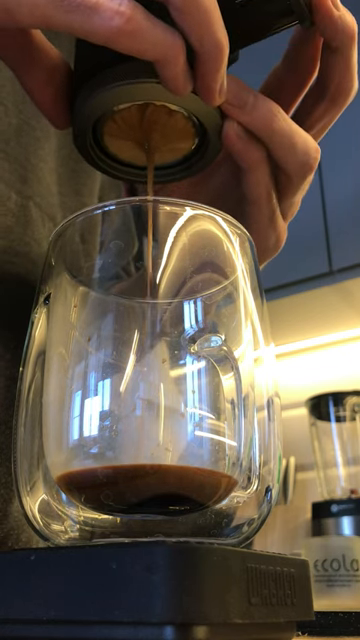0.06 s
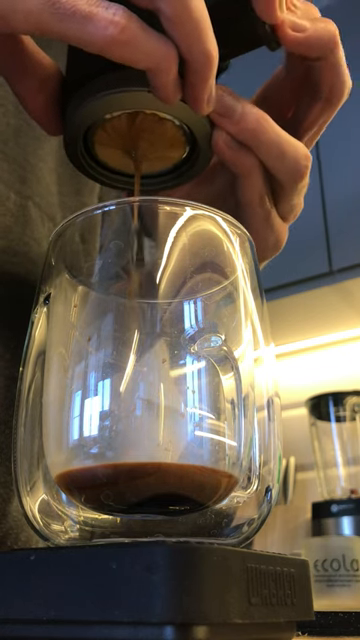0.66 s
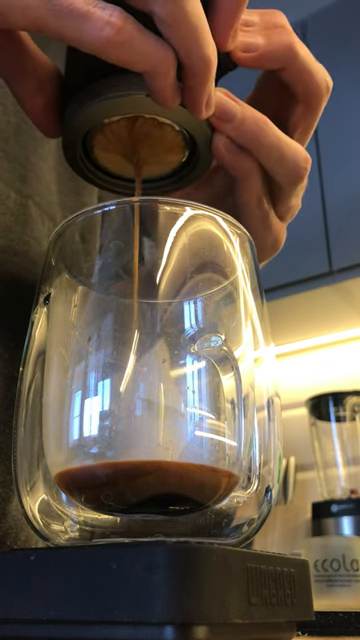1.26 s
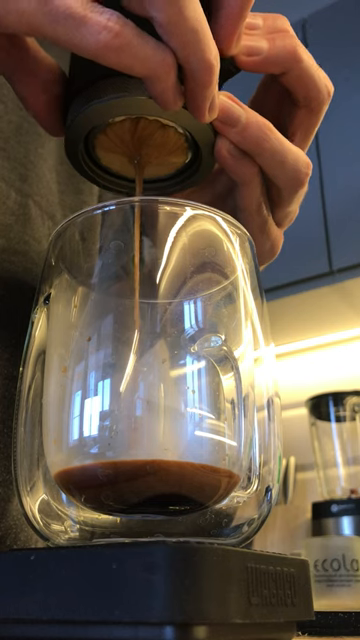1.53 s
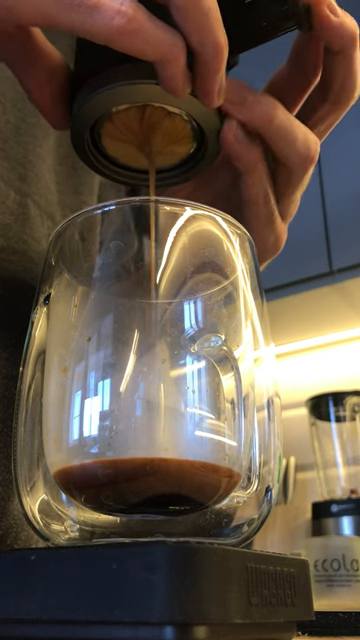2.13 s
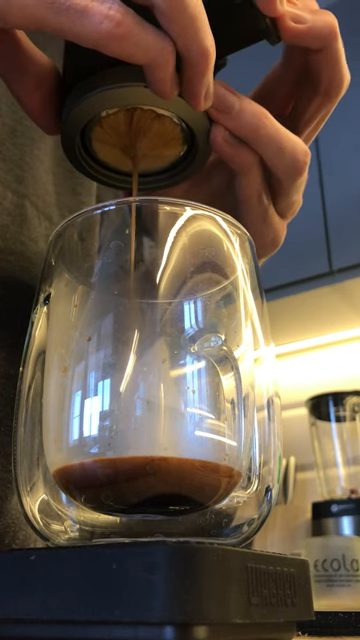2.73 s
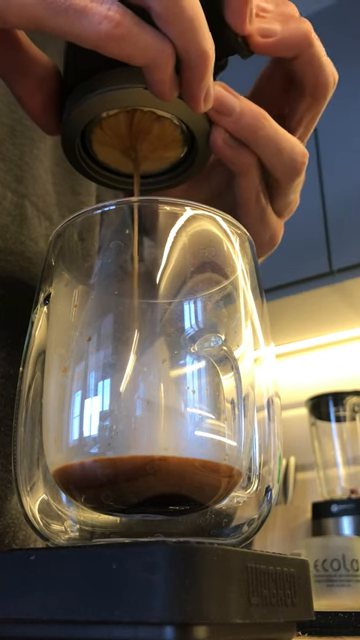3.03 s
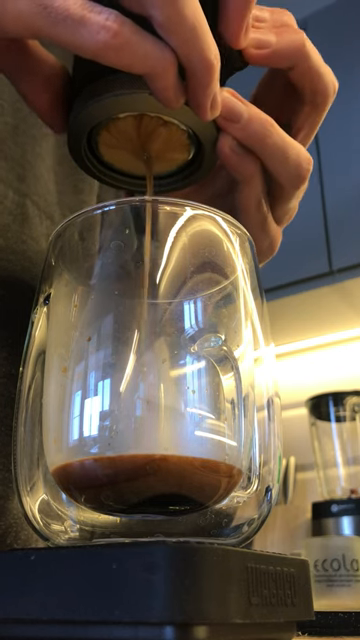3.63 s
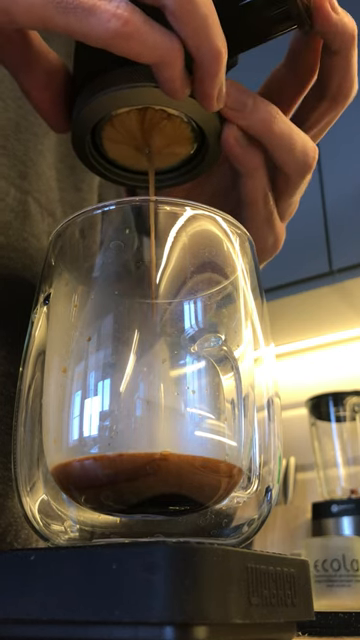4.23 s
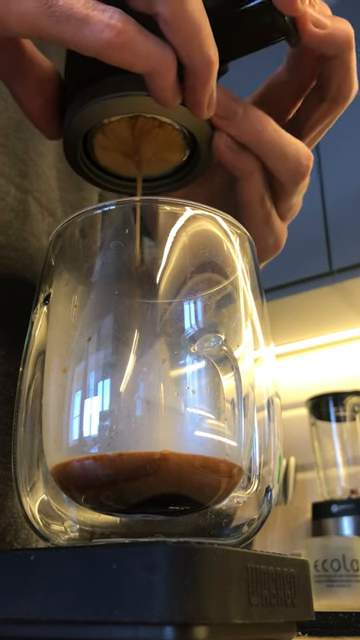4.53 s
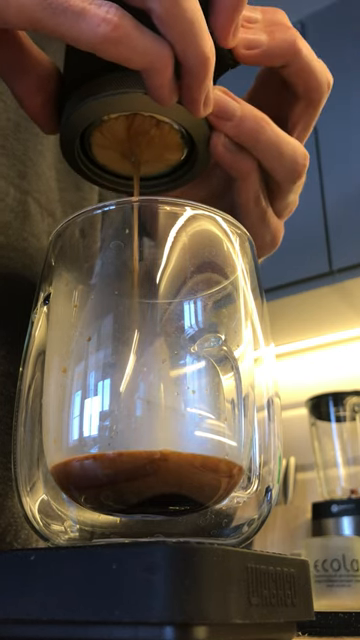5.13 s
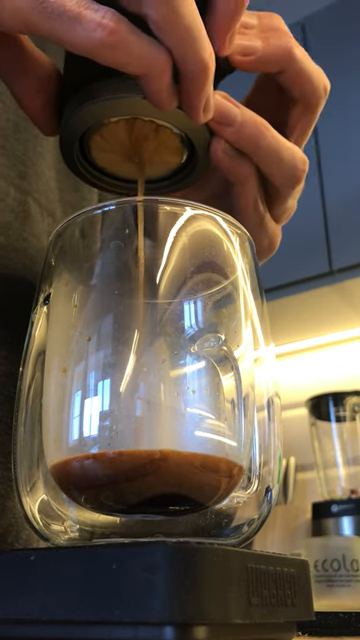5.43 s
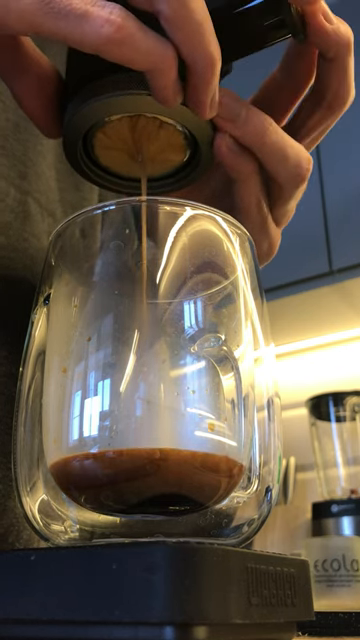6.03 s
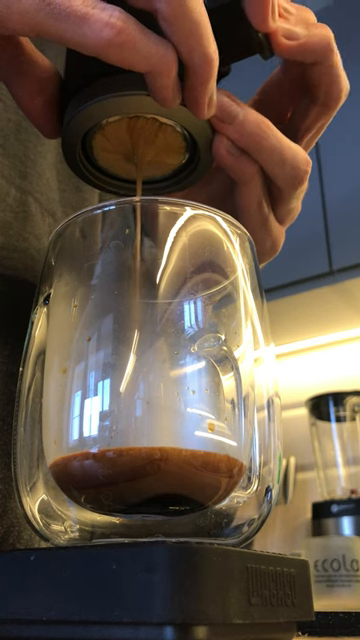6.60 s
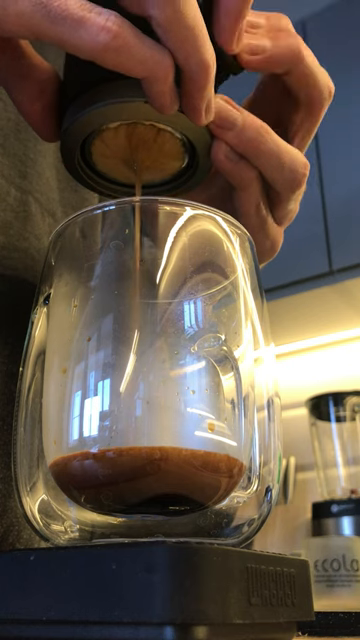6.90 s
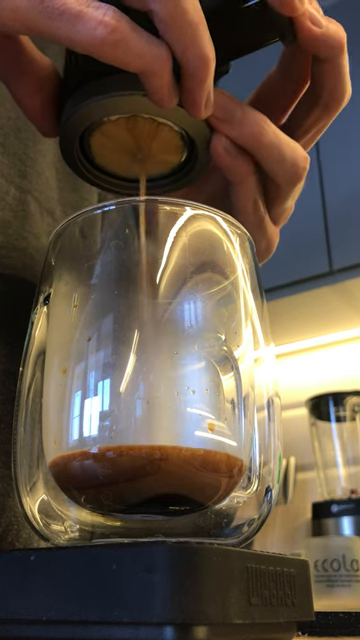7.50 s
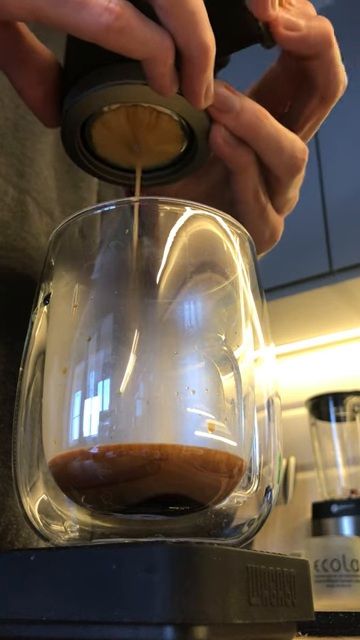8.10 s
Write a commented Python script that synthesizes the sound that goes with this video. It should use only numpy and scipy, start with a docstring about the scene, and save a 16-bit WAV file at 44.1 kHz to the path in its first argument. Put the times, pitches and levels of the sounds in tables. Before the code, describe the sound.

Coffee drips and plops into a glass, swelling with each push on a clicking hand pump in a quiet kitchen.

```python
"""A thin stream of espresso falls from a hand-pumped press into a double-walled glass cup.
It breaks into drops; each one ticks on the coffee and sets the air in the cup ringing with a plop,
lower as the cup fills. Drops, fine spatter and crackling foam swell with each push on the pump.
Sharp clicks come from the press and from crisply landing drops, and there is one faint squeak.
Behind it all is a quiet kitchen, with short echoes, a humming appliance and a faint rumble."""
import sys
import numpy as np
from scipy import signal
from scipy.fft import rfft, irfft
from scipy.io import wavfile

SR = 44100
rng = np.random.default_rng(int(sys.argv[2]) if len(sys.argv) > 2 else 0)


def inscribe(sig):
    """Save sig as 16-bit PCM at rate SR to the path in sys.argv[1].

    A 1-D sig is mono; a 2-D sig holds one channel per row.
    Samples are clipped to [-1, 1] before scaling.
    """
    pcm = np.round(np.clip(np.atleast_2d(sig).T, -1, 1) * 32767)
    wavfile.write(sys.argv[1], SR, pcm.astype(np.int16))


N = 368235
TIME = np.arange(N) / SR

# Drops placed one by one, from loud to faint. Each row: start in seconds, then the relative levels # in dB of
# the plop, the wet splat and the bright tick.
PLACED_DROPS = [(0.049, -36, -52, -68.0), (0.0626, -25, -59, -73), (0.0714, -40, -56, -52),
                (0.0786, -33.5, -55, -66.0), (0.1142, -33, -63, -67), (0.1415, -37.5, -68, -72),
                (0.1517, -31, -64, -72), (0.1814, -37.0, -41, -64), (0.2016, -56, -58, -74),
                (0.2291, -36, -53, -57), (0.263, -35.5, -55, -66), (0.2752, -35.5, -64, -70),
                (0.3317, -35, -62, -74), (0.3664, -33.5, -53, -54), (0.3888, -35.5, -71.0, -51),
                (0.4258, -36, -64.0, -73.0), (0.5007, -31.5, -49, -55), (0.5148, -26, -36, -39),
                (0.5851, -30.5, -56, -65), (0.6613, -37.5, -63, -73), (0.7582, -32.5, -49, -49),
                (0.8422, -30, -50, -52.5), (0.8618, -32, -65, -72.0), (0.8827, -29, -61, -60),
                (0.9118, -38.5, -68, -70.0), (0.9481, -36.5, -57, -69), (1.0385, -34, -57, -62),
                (1.0719, -34.5, -64.0, -56), (1.0946, -41.5, -70, -53.5), (1.1082, -31, -49, -50),
                (1.1271, -33.5, -67, -72.0), (1.159, -34.5, -56, -55), (1.2031, -32, -72, -72.0),
                (1.2409, -42, -60, -62), (1.2647, -29, -53, -49), (1.2785, -32, -49, -50),
                (1.3014, -30.5, -62, -52), (1.3181, -29, -73, -73.0), (1.3285, -36, -39.5, -40),
                (1.3474, -30.0, -53, -46), (1.3598, -28, -52.0, -65.0), (1.3746, -20, -38, -41.5),
                (1.3899, -30, -42, -44), (1.4083, -26, -52.0, -46), (1.4456, -39, -53, -56),
                (1.4582, -35, -70.0, -72.0), (1.4759, -43, -63, -73), (1.4874, -23.0, -48, -61),
                (1.5249, -44, -54, -65), (1.5461, -28, -57, -62), (1.6021, -33.0, -46, -49),
                (1.6335, -37, -42, -42.5), (1.6465, -22.5, -39.5, -44), (1.6781, -28.5, -45.5, -46),
                (1.696, -28.0, -59, -66.0), (1.7079, -24.5, -54, -72.0), (1.7309, -52, -45, -42.5),
                (1.7557, -25.5, -55, -49), (1.7778, -19.5, -62, -60), (1.7948, -28, -70, -61.0),
                (1.8243, -46, -56, -50), (1.8376, -32.5, -64, -69.0), (1.8853, -26.5, -55, -67),
                (1.9537, -35.5, -53, -67), (2.0107, -37.5, -52, -51), (2.0442, -38.5, -51, -56),
                (2.1033, -29.5, -48, -46.5), (2.1217, -27.5, -46, -54), (2.1551, -37, -68, -72),
                (2.1635, -30, -67, -57), (2.177, -24.5, -41.5, -51), (2.2209, -39, -62, -66),
                (2.2386, -35, -50, -62), (2.376, -25.5, -43, -41), (2.4358, -42, -62, -53),
                (2.4525, -26.5, -60, -68), (2.4923, -33.5, -70, -75), (2.5083, -37, -60, -72),
                (2.6222, -33.5, -55, -74.0), (2.763, -43, -68, -63), (2.7761, -36, -69.0, -73.0),
                (2.8037, -43, -54, -57), (2.8514, -36.5, -54, -64), (2.8947, -32.5, -46.5, -48.5),
                (2.9117, -37, -61, -60), (2.949, -61, -51, -48), (2.9642, -33.5, -64, -66),
                (3.0735, -37, -69, -49), (3.1226, -30, -50, -47), (3.1278, -33, -52, -62),
                (3.1555, -33.5, -55.0, -53), (3.1866, -40, -66, -59), (3.1989, -27, -47, -49),
                (3.2125, -28.5, -47, -52), (3.222, -40, -56, -63), (3.2506, -37, -53, -51.5),
                (3.2816, -30.5, -53, -58), (3.2929, -37, -72, -69.0), (3.31, -32, -66, -53),
                (3.3396, -42.5, -69, -73), (3.3549, -40, -65, -70), (3.3676, -34.5, -55, -68.0),
                (3.3811, -39, -51, -46), (3.3958, -37, -49.5, -52), (3.4119, -35, -65.0, -63),
                (3.4239, -37, -74.0, -69.0), (3.4514, -27, -55, -60), (3.4679, -30, -44, -47),
                (3.4844, -34.5, -68.0, -58), (3.4958, -33, -43.5, -48), (3.5056, -53, -50, -61.0),
                (3.5167, -36, -56, -58), (3.5251, -65, -48, -44), (3.5422, -32.5, -49, -61),
                (3.5581, -35, -50, -55), (3.5777, -44, -53, -48), (3.5879, -40, -49, -56),
                (3.6002, -35, -56, -65), (3.6133, -34, -66.0, -64), (3.6283, -35, -64, -74),
                (3.6485, -30.5, -49, -49), (3.659, -37, -60, -59), (3.6681, -33, -62, -64.0),
                (3.6776, -36, -47, -50), (3.6837, -34, -50, -56), (3.6943, -40, -58, -50),
                (3.7105, -44, -70.0, -55), (3.7288, -39, -57, -57.0), (3.736, -48, -50, -43),
                (3.7569, -33.5, -49, -48), (3.764, -32.5, -43, -48), (3.7817, -30, -35.5, -36.5),
                (3.7994, -28, -40, -43), (3.8535, -36, -45, -61), (3.8781, -35.0, -57.0, -66),
                (3.8879, -36, -56, -65), (3.9141, -29.5, -45.0, -51), (3.9549, -36.0, -57.0, -58),
                (3.9639, -53, -53, -46.5), (3.9871, -35, -54, -41), (4.0145, -35.5, -43, -51),
                (4.0339, -25.5, -43.5, -51), (4.0474, -28, -55, -50), (4.0602, -48, -52, -47.5),
                (4.0846, -37, -71.0, -59), (4.0948, -39, -58, -47.5), (4.1084, -30, -46, -66.0),
                (4.1247, -42, -47, -48), (4.1395, -37, -61, -54), (4.1559, -39, -51, -51),
                (4.219, -31, -46, -49), (4.227, -45, -43.5, -45.5), (4.2924, -39.0, -51, -50),
                (4.3072, -36, -63, -61), (4.4851, -34.5, -49, -47.5), (4.5116, -35.5, -58, -74.0),
                (4.5273, -41, -60, -48), (4.5533, -36.5, -67, -69.0), (4.5922, -31, -56, -56),
                (4.6174, -36, -57, -48.0), (4.638, -29.5, -45, -48), (4.6857, -29.5, -49, -53),
                (4.7764, -33, -48, -52), (4.8778, -46, -49.5, -54), (4.8922, -38.5, -56, -56),
                (4.9262, -36.5, -57, -73.0), (4.9463, -38.5, -49, -47.5), (4.9732, -45, -51, -49.5),
                (4.991, -33.5, -45.0, -44.5), (5.0147, -42, -59.0, -48), (5.0303, -41.0, -57, -48.0),
                (5.0531, -38.5, -59, -61), (5.0814, -38.5, -57, -52), (5.1186, -70, -66, -47.5),
                (5.1485, -30.5, -47, -49), (5.1667, -35.5, -55, -72.0), (5.1976, -43, -63, -54),
                (5.2153, -32.5, -69, -64), (5.2383, -40, -67, -51), (5.3065, -47, -50.0, -54),
                (5.3384, -37.5, -49, -47.5), (5.3627, -34.5, -45, -49.5), (5.4115, -23.5, -43, -50),
                (5.4253, -30.5, -51, -51.5), (5.4668, -39, -53, -67), (5.492, -35.5, -48.5, -46.5),
                (5.5141, -35, -55, -64.0), (5.5309, -35.0, -66.0, -72.0), (5.5455, -34, -45, -49),
                (5.5632, -28.5, -43, -48), (5.5751, -38, -59, -54), (5.601, -40, -45, -44),
                (5.6115, -38.5, -54, -57), (5.6201, -35.5, -40, -44.5), (5.6393, -31, -51, -49),
                (5.6639, -35.5, -53, -51), (5.679, -41, -54, -43.5), (5.6985, -38, -43.5, -47),
                (5.7192, -38, -43, -47), (5.7399, -61, -54, -61), (5.7586, -31, -50, -60),
                (5.7962, -29.5, -61, -52), (5.811, -39, -53, -46), (5.8318, -38, -69, -72.0),
                (5.8404, -33.5, -48, -54), (5.8656, -34.5, -39.5, -42.5), (5.8863, -32, -48, -46),
                (5.9289, -34.5, -52, -57), (5.9496, -42, -51, -73), (5.9562, -38, -56, -66),
                (5.9802, -38.5, -71, -67), (5.9887, -39, -70, -70), (6.0545, -55, -52, -53),
                (6.1373, -33.5, -51, -46.5), (6.1709, -34, -59, -57), (6.1824, -44, -49, -51),
                (6.2316, -32, -52, -71.0), (6.2442, -40, -56, -70), (6.3072, -38.5, -59, -78),
                (6.3245, -29, -48, -54), (6.3438, -49, -57, -47.5), (6.4141, -39, -47, -45.5),
                (6.6876, -40.5, -52, -62), (6.706, -37, -44.5, -48.0), (6.7271, -53, -47, -40.5),
                (6.747, -38.5, -67.0, -64), (6.8154, -40.5, -45, -49), (6.852, -41.5, -53, -54),
                (6.862, -35, -48, -51.5), (6.9147, -42.5, -49.5, -54.0), (6.9366, -45.5, -68.0, -51),
                (6.9707, -37, -60, -55), (6.988, -35.0, -43.5, -47.0), (7.0059, -42, -63, -70.0),
                (7.0552, -43, -61, -72), (7.0907, -36, -47, -54), (7.1546, -29.5, -45, -53),
                (7.1705, -32, -47, -50), (7.1815, -31.5, -49, -53), (7.1955, -32.5, -52, -39),
                (7.2107, -44, -52, -51), (7.2245, -44, -49, -54), (7.2485, -38.5, -57.0, -67.0),
                (7.2612, -51, -60, -53), (7.284, -55, -50.0, -58), (7.3017, -40.5, -41, -42.5),
                (7.3221, -41, -59.0, -68.0), (7.4217, -62, -47, -59), (7.4449, -41, -43, -46),
                (7.4649, -38.5, -61, -50), (7.499, -52, -53, -47), (7.543, -41, -57, -59),
                (7.5641, -33.5, -45, -46), (7.5874, -38.5, -50.0, -55), (7.6045, -43, -55, -69),
                (7.631, -49, -58, -52), (7.6535, -36, -45, -53), (7.7244, -36, -54.0, -59),
                (7.7711, -36.5, -67.0, -71.0), (7.7851, -58, -54, -49.5), (7.7957, -36.5, -60, -70),
                (7.815, -46, -59, -57), (7.837, -38.5, -44, -47.5), (7.8534, -41, -48, -45.5),
                (8.0097, -39, -65.0, -60), (8.1094, -42.5, -47.5, -55), (8.3151, -43, -64, -50),
                (8.3329, -39.5, -64, -68)]
# Pushes on the pump. Each row: start in seconds, hold in seconds, lift of the flow in dB,
# lift of the spatter in dB. Each layer follows these lifts by its own share.
PUMP_PUSHES = [(0.0, 0.022, 9.5, 4), (1.31, 0.038, 4, 4.5), (1.66, 0.13, 9, 6.5), (3.48, 0.36, 8.5, 8),
               (5.52, 0.13, 12, 9), (7.25, 0.28, 10, 7)]
# Ringing tones of the air in and around the cup. Each row: first and last pitch in Hz, width in Hz
# (wider dies sooner), first and last relative level in dB, direction of the first swing (1 or -1).
CUP_AIR_TONES = [(658.4, 523, 54.6, 0, 3.5, 1), (701, 677, 43, -10, -12, -1),
                 (790.3, 771.7, 40.4, -0.5, 3.5, -1), (804, 792, 19, -19, -16, -1),
                 (881, 810, 39, -10, -7.5, 1), (1070, 1004, 63, -30, -6, -1),
                 (1197, 1146, 45, -25, -19.5, -1), (1255, 1290, 77, -24.5, -9, 1),
                 (1356, 1360, 49, -30, -18, -1)]
# Higher resonances of the cup. Each row: pitch in Hz, width in Hz, lift in dB.
CUP_HIGH_TONES = [(1660, 51, 6.5), (2035, 105, 13.5), (2380, 120, 3), (2650, 124, 10), (2980, 59, 9),
                  (3940, 224, 13.5), (4640, 165, 8.5), (5925, 84, 12.5), (6310, 230, 7.5),
                  (7340, 170, 10.5), (8490, 56, 17.5), (9040, 270, 4.5)]
# Sharp, bright clicks from the press and from crisply landing drops.
# Each row: start in seconds, relative levels in dB of the crack and the knock.
SHARP_CLICKS = [(0.1826, -49, -41.5), (0.3658, -59, -52), (0.515, -53, -40.5), (0.7606, -56, -70),
                (1.252, -49, -50), (1.3276, -52, -51), (1.3747, -53, -49), (1.6397, -48.5, -40.5),
                (1.657, -65, -61), (2.162, -51.5, -44.5), (2.3751, -47.5, -40), (2.587, -56, -50),
                (3.47, -56, -60), (3.6486, -52, -64), (3.7569, -56, -54), (3.78, -61, -44),
                (3.7994, -59, -42), (3.987, -53, -45), (4.0833, -58, -47), (4.305, -53.5, -51),
                (4.527, -61, -64), (5.1486, -52.5, -55), (5.3379, -55, -48), (5.587, -47, -55),
                (5.795, -53, -44), (5.886, -55.5, -54), (6.138, -50.5, -40), (6.9, -58, -56),
                (7.195, -55, -43.5), (7.3265, -52, -51), (7.3545, -49, -60), (7.366, -56, -55),
                (7.6525, -53.5, -59), (8.331, -56, -63)]
# The plastic housing snaps under the grip. Each row: start in seconds, relative level in dB.
HOUSING_SNAPS = [(7.327, -46)]
# Ringing tones of the housing. Each row: pitch in Hz, relative level in dB, seconds to fade by 60 dB.
HOUSING_TONES = [(1692, -5.5, 0.051), (2370, 3, 0.019), (2580, -8, 0.071), (2883, -11, 0.1),
                 (2990, 5, 0.0098), (3650, -1, 0.013), (4000, -10, 0.034), (4100, -13, 0.025)]
# A squeak, probably the pump's seal. Each row: start and length in seconds, pitch in Hz, level in dB.
SEAL_SQUEAKS = [(8.035, .035, 1970, -67)]
# Echoes off nearby surfaces. Each row: delay in seconds, level in dB.
KITCHEN_ECHOES = [(.0112, -32), (.0215, -25), (.0465, -25.5)]
# Motor hum; two close tones beat against each other. Each row: pitch in Hz, relative level in dB.
MOTOR_TONES = [(48.83, -70), (73.3, -79), (97.7, -81), (111.5, -75), (146.5, -66), (148.62, -68),
               (195.3, -61), (223, -74), (293, -79), (341.8, -72)]
# A low rumble that comes and goes. Each row: time in seconds, level in dB.
RUMBLE_LEVELS = [(0, -69), (.45, -62), (.8, -83), (7.4, -99), (7.8, -58), (8.35, -64)]

# Colours: how strong a sound is from bass to treble. Each row: frequency in Hz, relative level in dB.
SPLASH_COLOUR = [(900, -13), (1250, 12.5), (1600, -1.5), (2600, 0.5), (3300, -4.5), (4300, -3), (5300, -11),
                 (7000, -8.5), (7900, -13), (9500, -8), (12500, -7), (16000, 1.5)]   # a bare splash
CREMA_COLOUR = [(800, -29), (2000, 9), (4000, -10), (7000, -2), (9500, -37), (12500, 15), (15800, 3)]   # coffee foam crackling at the spout
CRACK_COLOUR = [(800, -10), (2000, -12), (4500, 2), (7000, 0), (9000, -2.5), (11500, 3.5), (15500, 3)]   # the crisp start of a click
BODY_COLOUR = [(400, -17), (900, 11.5), (1300, 14), (1650, -13), (2100, 10.5), (2700, -7), (3400, -32),
               (8000, -49)]   # the dull knock under a click
RATTLE_COLOUR = [(600, -58), (1100, -8), (1350, 6), (1520, -8), (1700, 0), (2200, -6), (2900, -2),
                 (3400, -14), (4400, -18), (6000, -40), (12000, -23)]   # the hollow rattle after a click
AIR_COLOUR = [(20, -41), (33, -15), (46, -12), (70, 2), (110, -4), (175, -0.5), (260, -2.5), (420, -5.5),
              (1000, -11.5), (1600, -21.5), (3200, -24.5), (8500, -31), (13000, -26), (15800, -24)]   # still kitchen air and hiss
LOW_RUMBLE_COLOUR = [(30, -17), (55, 10.5), (90, 6), (165, 14.5), (260, -7.5), (500, -32.5)]   # the passing rumble


def stream():
    """Drops placed one by one, a random trickle of drops and a drizzle of droplets, over the fizz of the foam
    in the cup."""
    drops = trickle(count=240, plop_db=-47, splat_db=-62, splash_spread_db=3, follows=0.27)
    droplets = trickle(count=1100, plop_db=-55.5, splat_db=-75, splash_spread_db=9.5, follows=1.15)
    ringing, splashing = placed_drops() + drops + droplets
    foam = fizz(-83 + 1.18 * spatter_db(TIME), per_s=1500, spread_db=5)
    return ringing + in_cup(splashing + spatter() + foam)


def placed_drops():
    """Each placed drop lands with a plop and a splash, returned as two tracks."""
    starts, plop_db, splat_db, tick_db = np.transpose(PLACED_DROPS)
    return np.array([plops(starts, plop_db), splashes(starts, splat_db, tick_db)])


def trickle(count, plop_db, splat_db, splash_spread_db, follows, plop_spread_db=4.5):
    """The stream pinches off drops of random size at a loosely even pace: plops and splashes."""
    late, size, splashiness = np.clip(rng.standard_normal((count, 3)), -3, 1.2).T
    starts = np.abs(np.arange(count) + .5 + .5 * late) * TIME[-1] / count
    # a placed drop gathers the liquid, so the trickle just before it is thinner
    wait_s = np.transpose(PLACED_DROPS)[0][:, None] - starts
    thinning_db = 5.5 * np.any((wait_s > 0) & (wait_s < 0.0098), axis=0)
    ring_db = plop_db + follows * flow_db(starts) - thinning_db + plop_spread_db * size
    splash_db = splat_db + follows * spatter_db(starts) - thinning_db
    splash_db += splash_spread_db * (size + splashiness) / np.sqrt(2)
    return np.array([plops(starts, ring_db), splashes(starts, splash_db, splash_db - 2)])


def plops(starts, levels_db, pitch_spread=.021, spread_db=2.2, hard_drop_db=-27):
    """Each drop rings the air in the cup a little differently; most tones sink as the coffee rises."""
    out, t = np.zeros(N), TIME[:3072]
    first_hz, last_hz, width_hz, first_db, last_db, direction = np.transpose(CUP_AIR_TONES)
    decay = np.sign(direction)[:, None] * np.exp(-np.pi * width_hz[:, None] * t)
    chances = rng.standard_normal((len(starts), 2, len(CUP_AIR_TONES)))
    for s, level_db, (pitch_chance, level_chance) in zip(starts, levels_db, chances):
        fill = s / TIME[-1]
        hz = (first_hz + fill * (last_hz - first_hz)) * (1 + pitch_spread * pitch_chance)
        # a harder landing rings the upper tones more
        tilt_db = 0.23 * (level_db - hard_drop_db) * np.log2(hz / hz[0])
        gains = from_db(first_db + fill * (last_db - first_db) + tilt_db + spread_db * level_chance)
        ring = gains @ (decay * np.sin(2 * np.pi * hz[:, None] * t))
        add(out, s, from_db(level_db) * ring / np.abs(ring).max())
    # the plops carry little bass below about 440 Hz
    return keep_band(out + 1e-18, "high", 440, order=4)


def splashes(starts, splat_db, tick_db):
    """A splash is a wet splat, a dry, brighter tick and a puff of fine spray."""
    splat = impacts(starts, splat_db + 3, band_hz=(1210, 2840), fade_s=0.0033)
    tick = impacts(starts, tick_db + 8, band_hz=(3580, 7570), fade_s=0.0018)
    puff = impacts(starts, tick_db + 6, band_hz=(9800, 14500), fade_s=0.0095)
    return splat + tick + puff


def impacts(starts, levels_db, band_hz, fade_s, spray_share=.6, size=512):
    """Liquid lands with a sharp hit and a tiny burst of spray, heard in one frequency band."""
    spray = rng.standard_normal((len(starts), size)) * np.exp(-TIME[:size] / fade_s)
    spray *= spray_share / np.linalg.norm(spray, axis=1, keepdims=True)
    bursts = keep_band(signal.unit_impulse(size) + spray, "band", band_hz, order=2)
    out = np.zeros(N)
    for s, level_db, burst in zip(starts, levels_db, bursts):
        add(out, s, from_db(level_db) * burst / np.linalg.norm(burst))
    return out


def spatter(count=380, follows=1.06, spread_db=4.5):
    """Specks thrown off the stream tick on the coffee and the glass, too small to plop."""
    starts = rng.uniform(0, TIME[-1], count)
    sizes = np.clip(rng.standard_normal(count), -2, 1.5)
    levels_db = -61 + follows * (spatter_db(starts) - 3) + spread_db * sizes
    return splashes(starts, levels_db, levels_db - 1)


def in_cup(sound):
    """Every splash is coloured by the same higher resonances of the glass cup."""
    out = coloured(sound, SPLASH_COLOUR)
    for hz, width_hz, lift_db in CUP_HIGH_TONES:
        out = out + (from_db(lift_db) - 1) * resonance(out, hz, width_hz)
    return out


def flow_db(times):
    """Drops land harder with each push, and softer as the growing foam cushions them."""
    lifts_db = np.transpose(PUMP_PUSHES)[2]
    return pump_swell(times, lifts_db, rise_s=0.037, fall_s=0.17) - 0.5 * times


def spatter_db(times):
    """Under pressure the stream spatters and foams more."""
    lifts_db = np.transpose(PUMP_PUSHES)[3]
    return pump_swell(times, lifts_db, rise_s=0.042, fall_s=0.24)


def pump_swell(times, lifts_db, rise_s, fall_s):
    """The lift in dB at these times: each push builds up, holds and relaxes."""
    start, hold = np.transpose(PUMP_PUSHES)[:2, :, None]
    before = np.maximum(start - times, 0) / rise_s
    after = np.maximum(times - start - hold, 0) / fall_s
    return np.max(lifts_db[:, None] * np.exp(-before - after), axis=0)


def fizz(level_db, per_s, spread_db):
    """Foam bubbles burst at random: many tiny ones, a few larger."""
    sizes = from_db(spread_db * np.minimum(rng.exponential(1, N), 3))
    signs = rng.choice([-1, 1], N)
    bursting = rng.random(N) < per_s / SR
    return from_db(level_db) * unit_power(sizes * signs * bursting)


def spout():
    """Above the cup the foam crackles brightly as the coffee is pushed out."""
    crackle = fizz(-85.5 + 0.46 * spatter_db(TIME), per_s=490, spread_db=7.5)
    return coloured(crackle, CREMA_COLOUR)


def sharp_clicks(crack_s=0.0044, grit_s=0.019, knock_s=0.0019, rattle_s=0.03):
    """The press or a crisply landing drop clicks: a gritty crack, a dull knock and a hollow rattle."""
    cracks, knocks, rattles = np.zeros((3, N))
    t = TIME[:8192]
    crack_fade = np.exp(-t / crack_s) + from_db(-6) * np.exp(-t / grit_s)
    for s, crack_db, knock_db in SHARP_CLICKS:
        noise = rng.standard_normal((3, len(t)))
        add(cracks, s, from_db(crack_db - 6) * noise[0] * crack_fade)
        add(knocks, s, from_db(knock_db) * noise[1] * np.exp(-t / knock_s))
        add(rattles, s, from_db(knock_db - 19) * noise[2] * np.exp(-t / rattle_s))
    return (coloured(cracks, CRACK_COLOUR) + coloured(knocks, BODY_COLOUR)
            + coloured(rattles, RATTLE_COLOUR))


def housing():
    """The plastic housing rings when it snaps under the grip; each click gets a faint, similar ring."""
    out, t = np.zeros(N), TIME[:8192]
    ring = sum(from_db(db - 60 * t / fade_s) * np.sin(2 * np.pi * hz * t)
               for hz, db, fade_s in HOUSING_TONES)
    for s, level_db in HOUSING_SNAPS:
        add(out, s, from_db(level_db) * ring)
    for s, _, knock_db in SHARP_CLICKS:
        add(out, s, from_db(knock_db - 19) * ring)
    return out


def squeak(glide=-0.1, roughness=0.03):
    """A faint, short squeak that sinks in pitch."""
    out = np.zeros(N)
    for s, length_s, hz, level_db in SEAL_SQUEAKS:
        progress = np.linspace(0, 1, int(length_s * SR))
        pitch_hz = hz * (1 + glide * progress + roughness * rng.standard_normal(len(progress)))
        tone = np.sin(2 * np.pi * np.cumsum(pitch_hz) / SR)
        add(out, s, from_db(level_db) * np.sin(np.pi * progress) * tone)
    return out


def kitchen(sound, split_hz=1300, tail_delay_s=.003):
    """A few echoes off counter and cupboards, and a smooth tail whose treble dies sooner."""
    low = keep_band(dying_noise(fade_s=0.16), "low", split_hz, order=2)
    high = keep_band(dying_noise(fade_s=0.1), "low", 6000, order=1)
    high = keep_band(high, "high", split_hz, order=3)
    tail = from_db(-12.5) * low + from_db(-6.5) * high
    echoes = np.pad(tail, (int(tail_delay_s * SR), 0))
    for s, db in KITCHEN_ECHOES:
        echoes[int(s * SR)] += from_db(db)
    return sound + signal.fftconvolve(sound, echoes)[:N]


def motor_hum(in_step_s=.2):
    """An appliance motor hums; two close tones drift in and out of step, so the hum throbs."""
    return sum(np.sqrt(2) * from_db(db - 1) * np.sin(2 * np.pi * hz * (TIME - in_step_s))
               for hz, db in MOTOR_TONES)


def room_air():
    """The steady hush of the kitchen, and a low rumble near the start and the end."""
    hush = from_db(-64.5) * coloured(rng.standard_normal(N), AIR_COLOUR, size=8192)
    rumble_db = np.interp(TIME, *np.transpose(RUMBLE_LEVELS))
    rumble = from_db(rumble_db) * coloured(rng.standard_normal(N), LOW_RUMBLE_COLOUR, size=8192)
    return hush + rumble


def dying_noise(fade_s, size=SR // 2):
    """Noise that favours no pitch and dies by about 60 dB in fade_s seconds."""
    noise = rng.standard_normal(size) * from_db(-60 * TIME[:size] / fade_s)
    spectrum = rfft(noise, 2 * size)
    return irfft(spectrum / np.abs(spectrum))[:size]


def coloured(sound, colour, size=2048):
    """Shape a sound with a colour table; white noise keeps its power."""
    hz, level_db = np.transpose(colour)
    grid_hz = np.maximum(np.arange(size + 1) * SR / (2 * size), 1)
    gain = unit_power(from_db(np.interp(np.log(grid_hz), np.log(hz), level_db)))
    # build the filter so that it rings only after a hit, never before it (minimum phase)
    cepstrum = irfft(np.log(gain))
    cepstrum[1:size] *= 2
    cepstrum[size + 1:] = 0
    response = irfft(np.exp(rfft(cepstrum)))
    return signal.fftconvolve(sound, response)[:N]


def resonance(sound, hz, width_hz):
    """Let one pitch through at full strength and weaken those around it."""
    r = np.exp(-np.pi * width_hz / SR)
    feedback = [1, -2 * r * np.cos(2 * np.pi * hz / SR), r * r]
    return signal.lfilter(np.array([1, 0, -1]) * (1 - r * r) / 2, feedback, sound + 1e-18)


def keep_band(sound, kind, hz, order):
    """Keep the lows, the highs or a band between; a higher order cuts more steeply."""
    return signal.sosfilt(signal.butter(order, hz, kind, fs=SR, output="sos"), sound)


def add(out, s, sound):
    """Mix a sound in at s seconds."""
    start = int(np.clip(s * SR, 0, N - 1))
    out[start:start + len(sound)] += sound[:N - start]


def from_db(db):
    """Turn decibels into a factor to multiply by."""
    return 10 ** (np.asarray(db) / 20)


def unit_power(x):
    """Scale to an average power of one."""
    return x / np.sqrt(np.mean(x ** 2) + 1e-20)


def scene():
    """Cup, spout and press close by, the kitchen around them, in one channel."""
    close = stream() + spout() + sharp_clicks() + housing() + squeak()
    return (kitchen(close) + motor_hum() + room_air())[None]


def record(dry):
    """The treble above 15900 Hz is cut steeply."""
    return signal.sosfilt(signal.ellip(10, .1, 70, 15900, fs=SR, output="sos"), dry)


dry = scene()
out = record(dry)
inscribe(out)
```